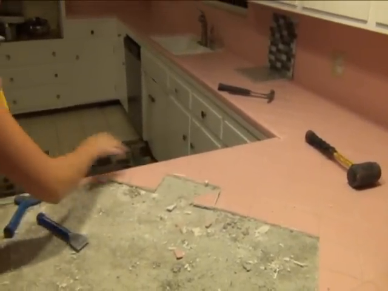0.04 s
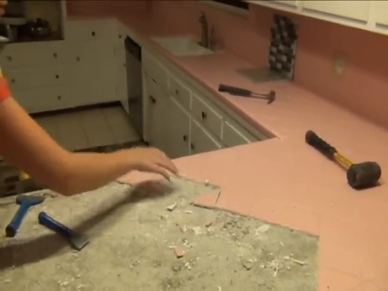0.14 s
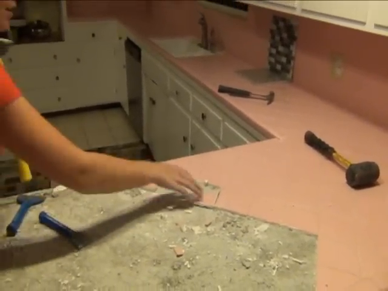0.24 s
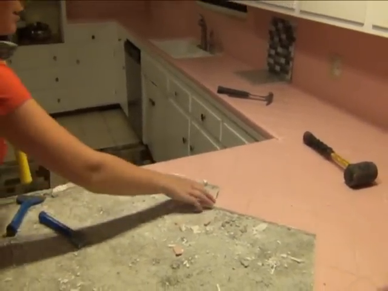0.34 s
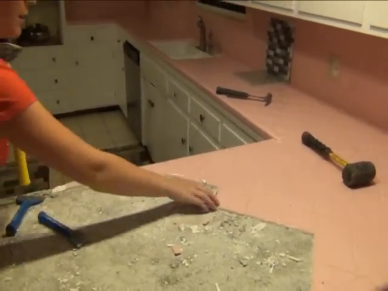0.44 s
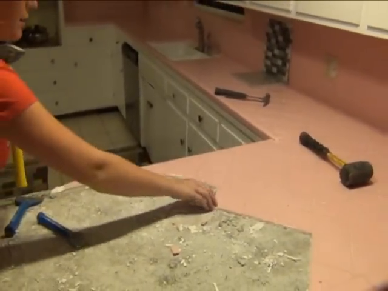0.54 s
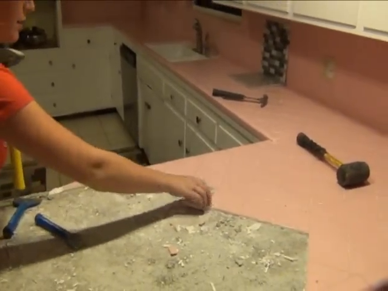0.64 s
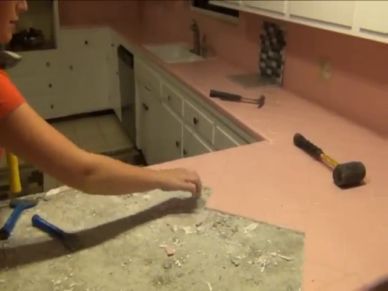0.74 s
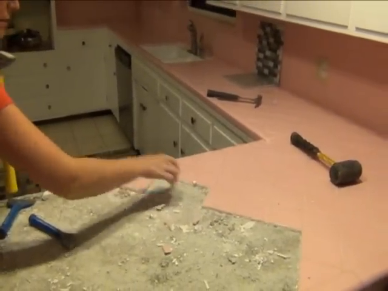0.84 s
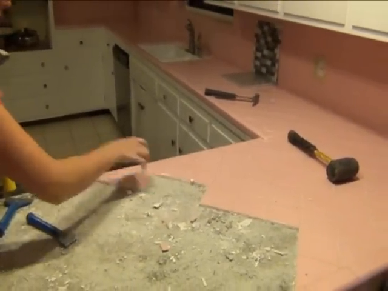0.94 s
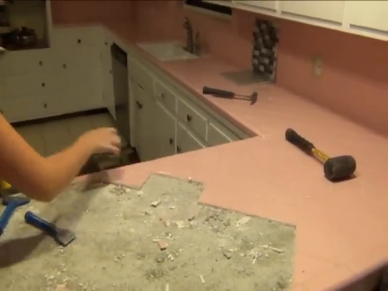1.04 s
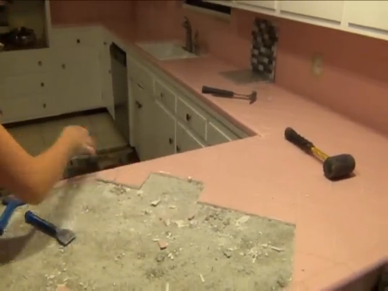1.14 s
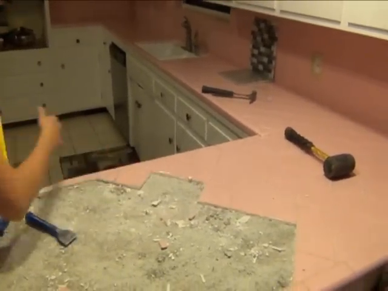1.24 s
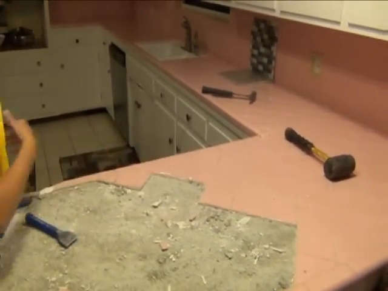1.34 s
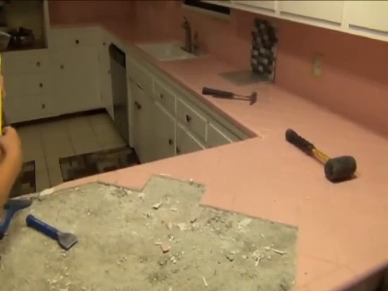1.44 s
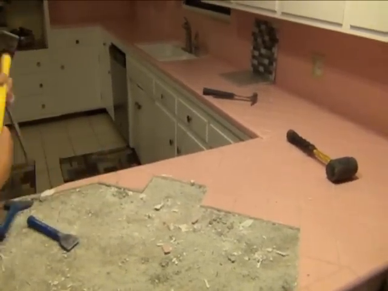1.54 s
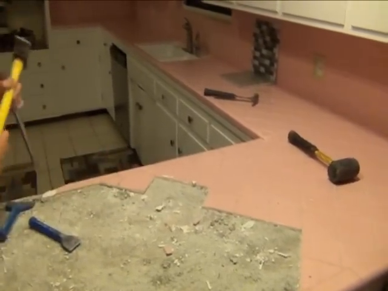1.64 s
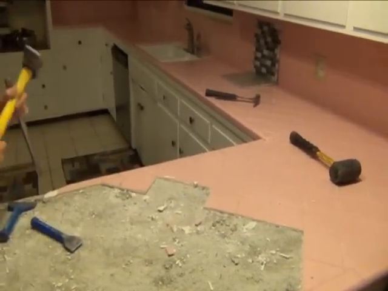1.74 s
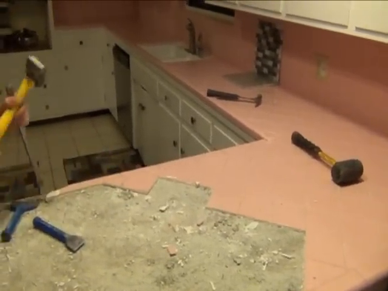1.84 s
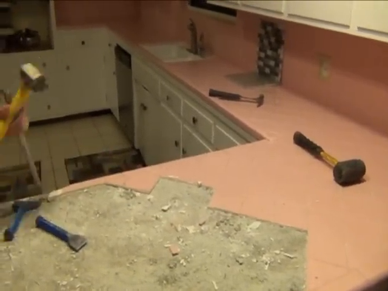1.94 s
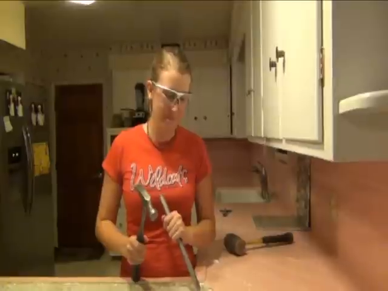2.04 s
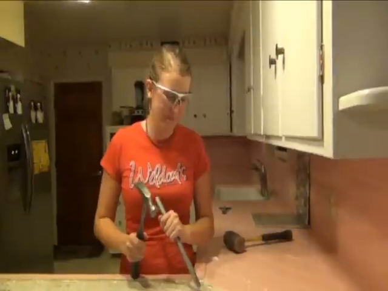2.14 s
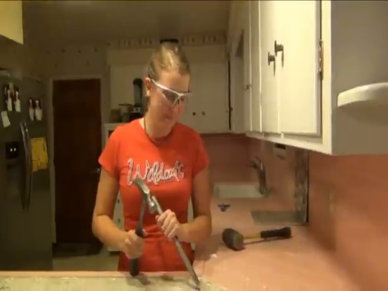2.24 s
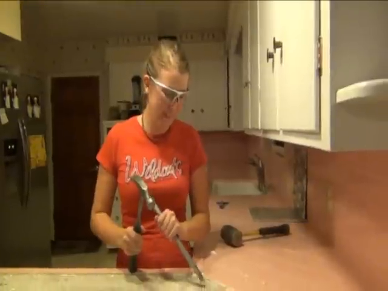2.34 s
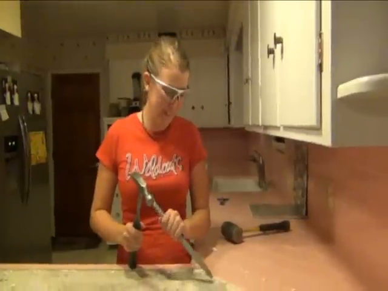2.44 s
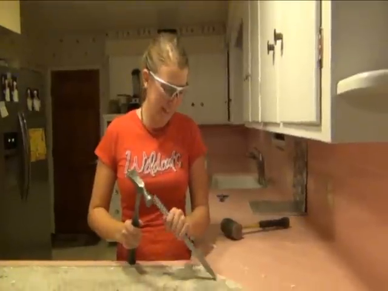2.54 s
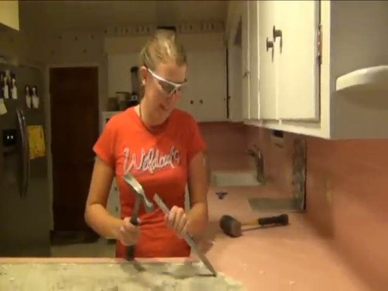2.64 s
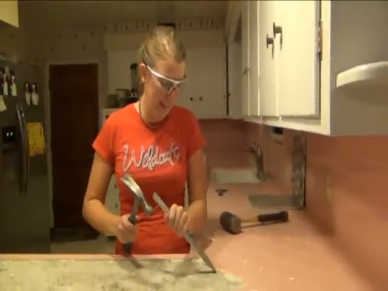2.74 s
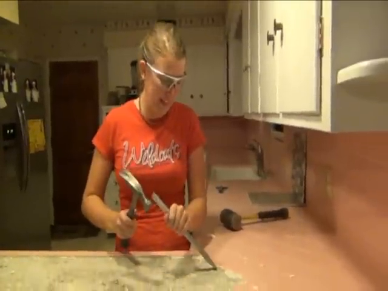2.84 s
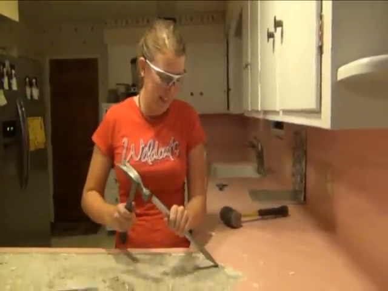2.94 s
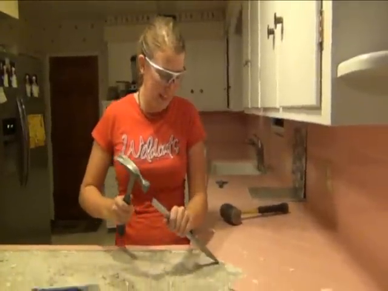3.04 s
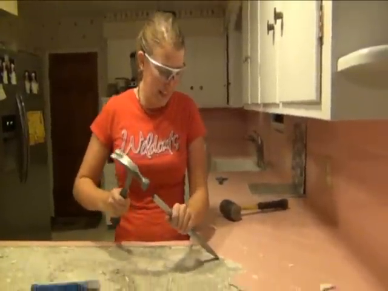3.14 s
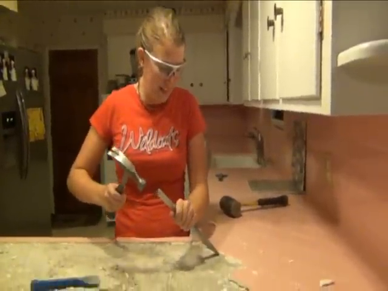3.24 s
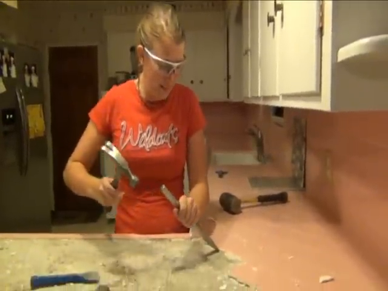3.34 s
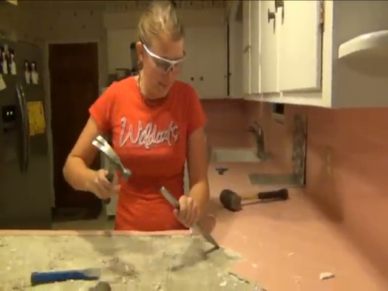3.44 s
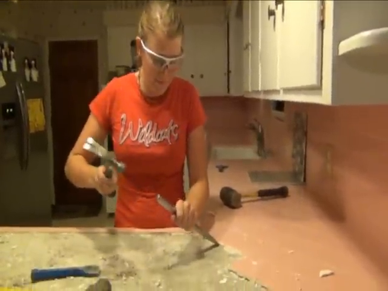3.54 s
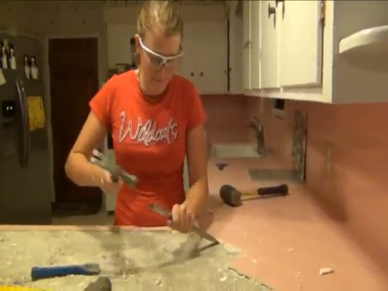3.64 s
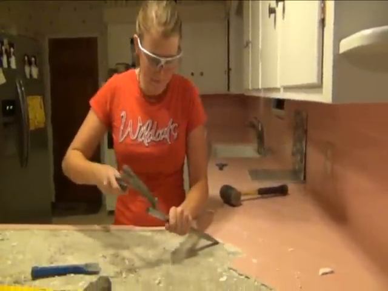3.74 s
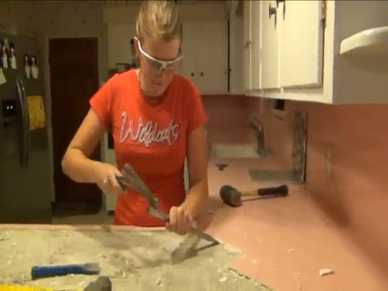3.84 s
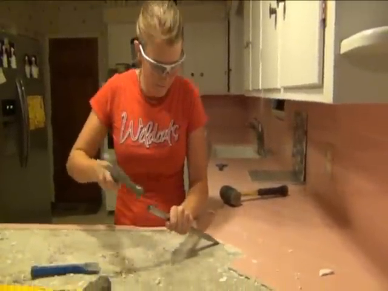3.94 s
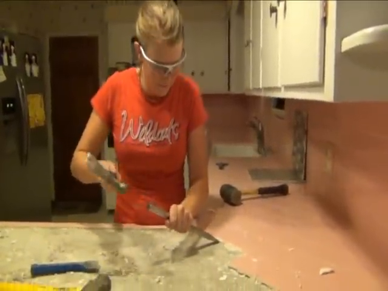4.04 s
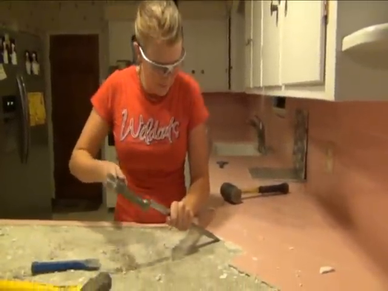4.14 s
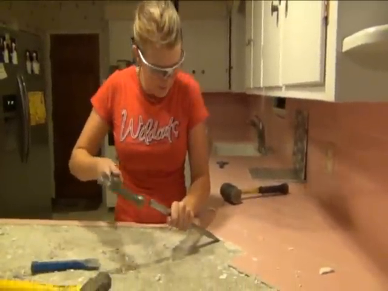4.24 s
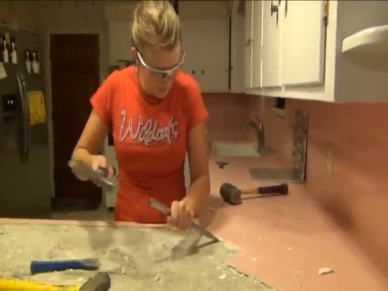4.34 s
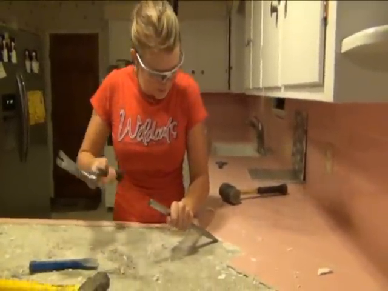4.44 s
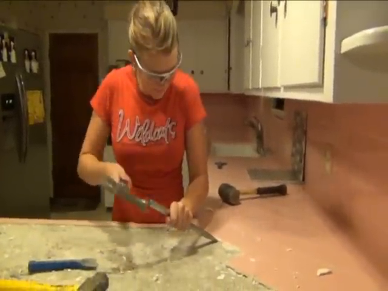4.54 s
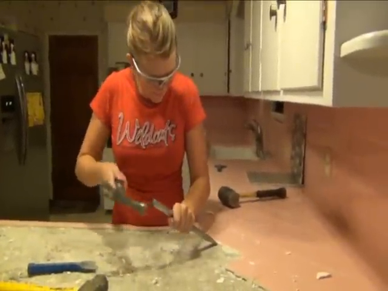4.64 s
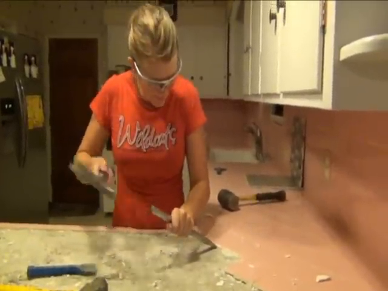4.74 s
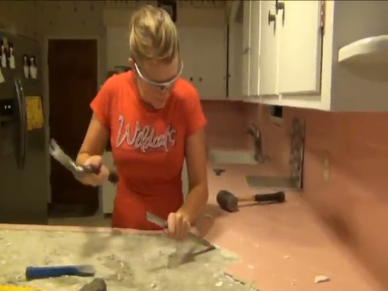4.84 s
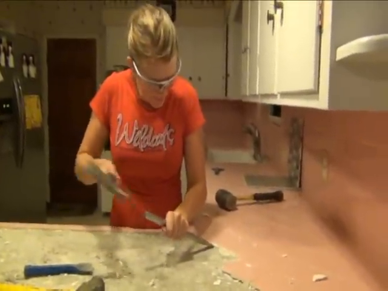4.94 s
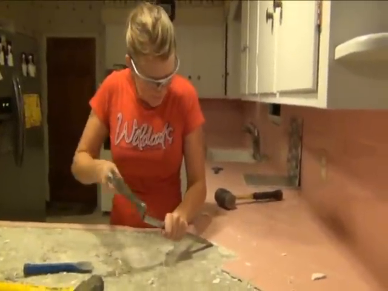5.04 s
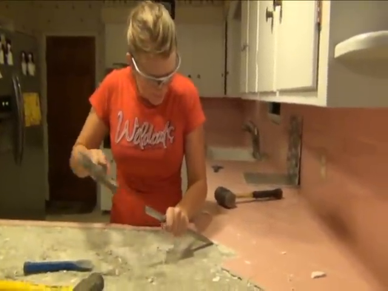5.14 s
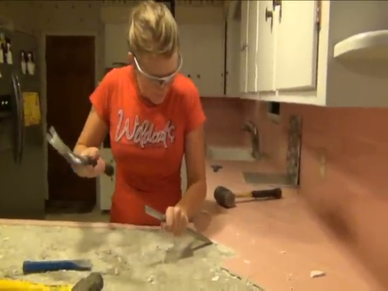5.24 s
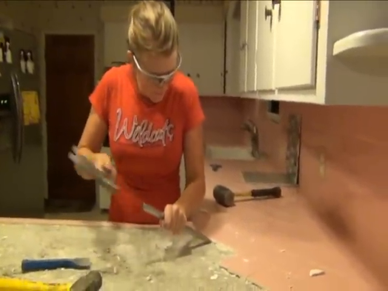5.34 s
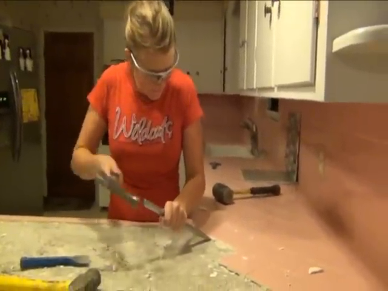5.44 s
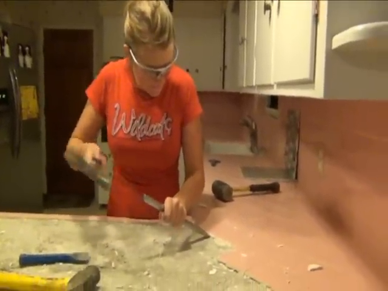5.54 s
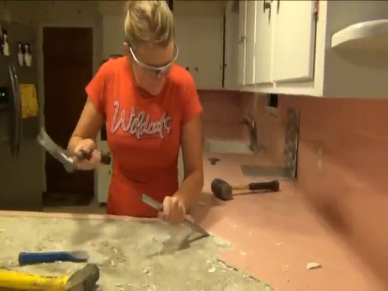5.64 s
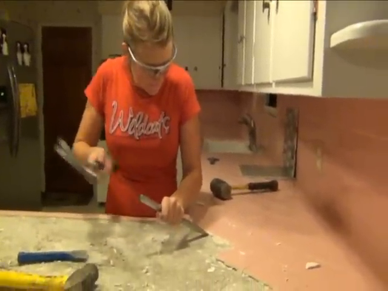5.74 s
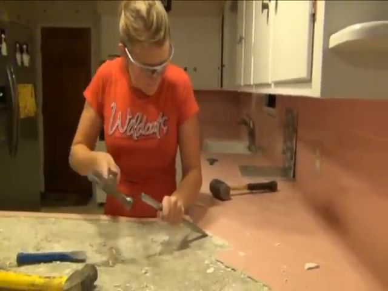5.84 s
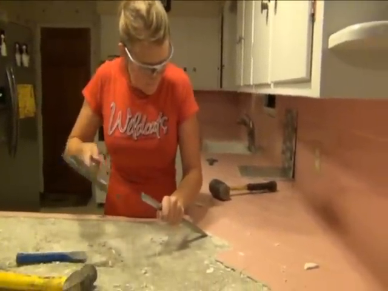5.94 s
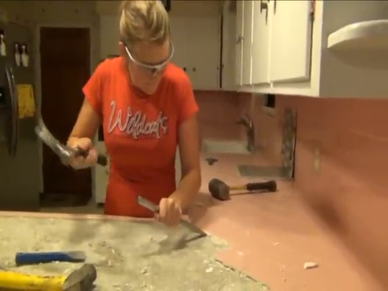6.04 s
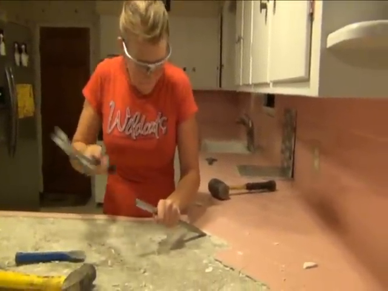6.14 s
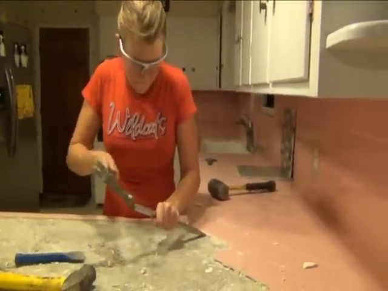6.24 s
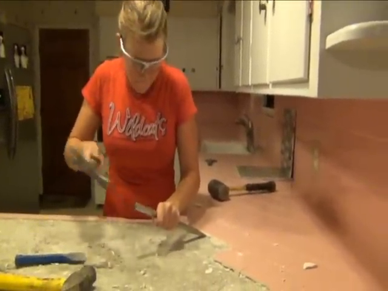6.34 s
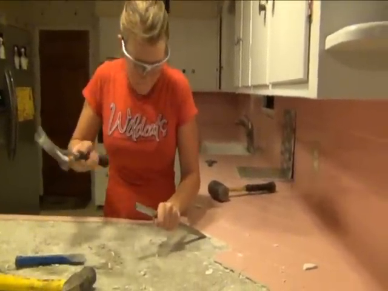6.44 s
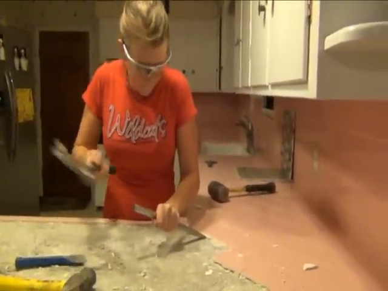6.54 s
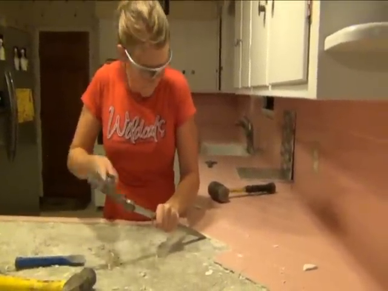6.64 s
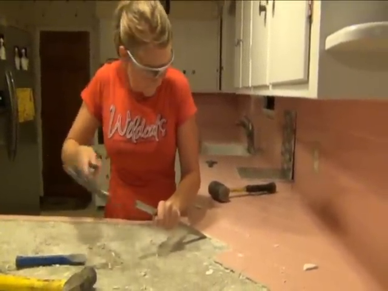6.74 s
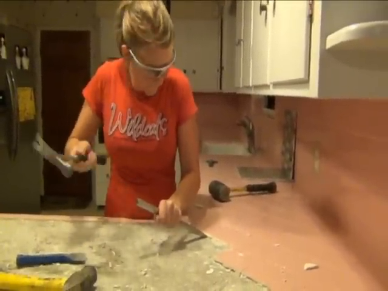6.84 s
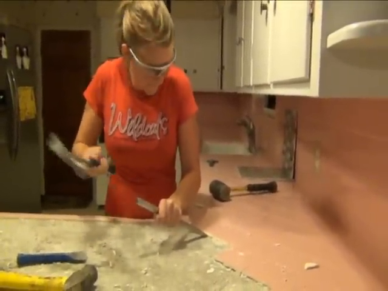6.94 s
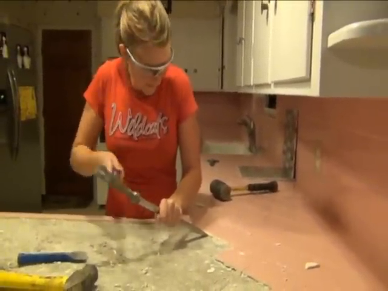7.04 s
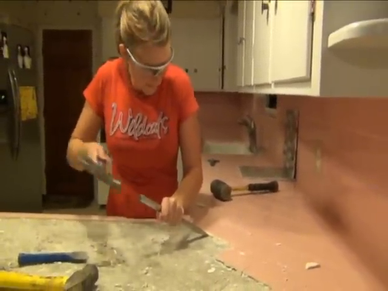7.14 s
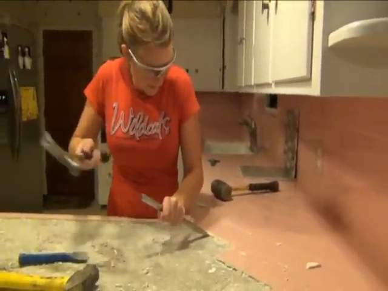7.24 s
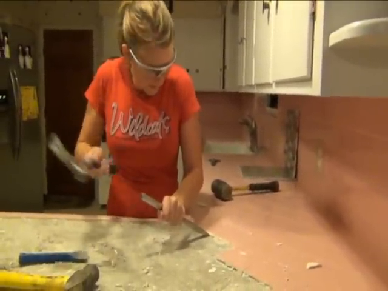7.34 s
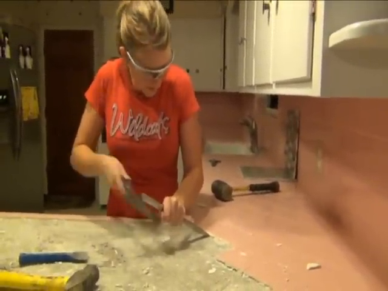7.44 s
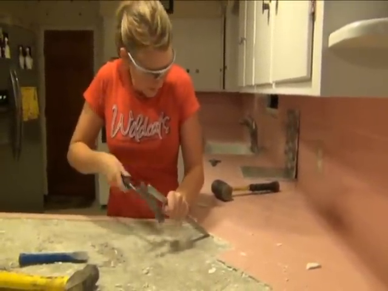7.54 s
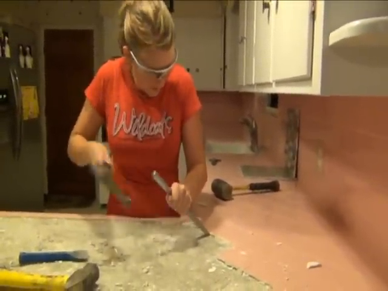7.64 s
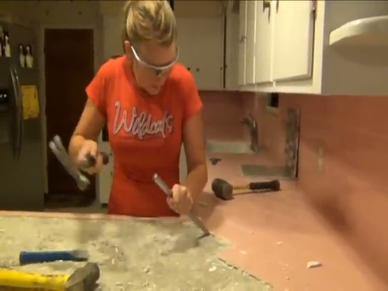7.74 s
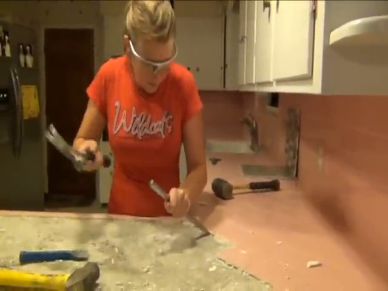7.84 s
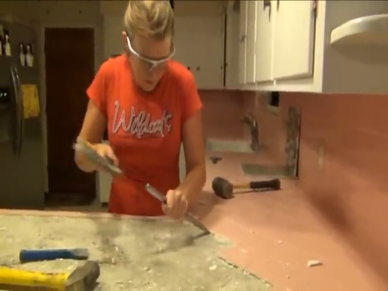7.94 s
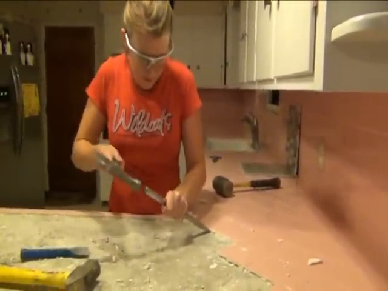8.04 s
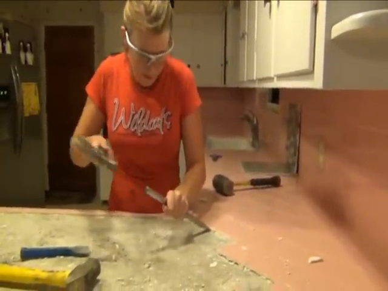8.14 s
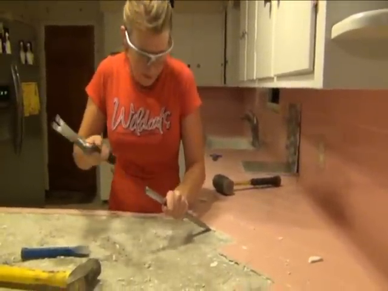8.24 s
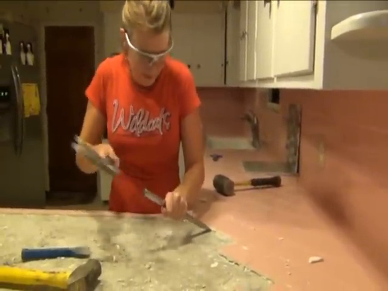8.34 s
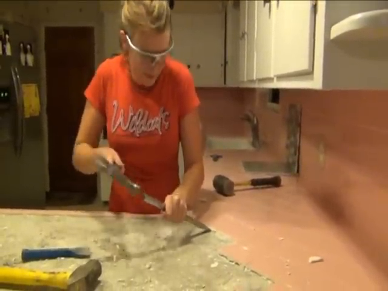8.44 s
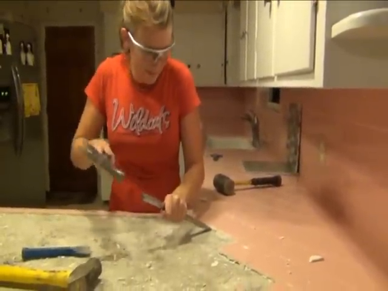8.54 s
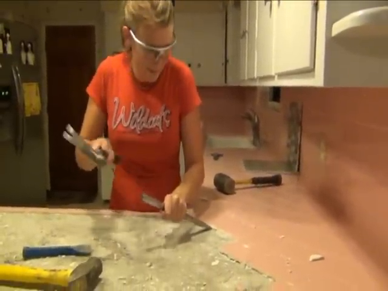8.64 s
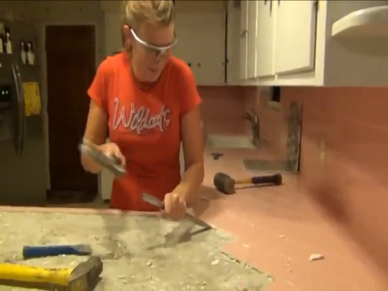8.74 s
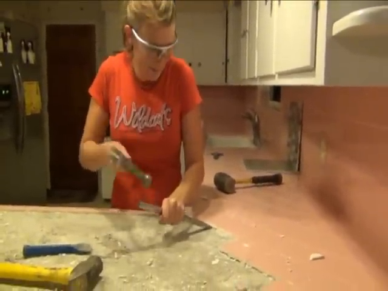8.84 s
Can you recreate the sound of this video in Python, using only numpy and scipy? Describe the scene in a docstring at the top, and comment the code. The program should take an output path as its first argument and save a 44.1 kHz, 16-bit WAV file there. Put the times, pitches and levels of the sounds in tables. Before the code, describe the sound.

Two pieces of broken tile clack onto a pile and tumble to rest, with dull knocks on wood. Then a steel chisel clinks lightly on a tiled counter and is tapped in. A hammer strikes it hard in a steady rhythm, each blow cracking against the tile, booming through the counter and ringing the steel; one glances off. The bare kitchen echoes around the nearby work, over a low room tone.

```python
"""Two pieces of broken tile clack onto a pile and tumble to rest, with dull knocks on wood. Then, abruptly,
a steel chisel clinks on a tiled kitchen counter, is tapped in, and is struck hard with a hammer.
Each square blow cracks against the tile, booms through counter and cabinet, and rings the chisel;
one blow glances off. The bare kitchen echoes over a low room tone, and a limiter holds
the heavy blows nearly flat until their reverberation has died below its ceiling."""
import sys
import numpy as np
from scipy import signal
from scipy.fft import rfft, irfft
from scipy.io import wavfile
from scipy.ndimage import uniform_filter1d

SR = 44100
rng = np.random.default_rng(int(sys.argv[2]) if len(sys.argv) > 2 else 0)


def digitize_waveform(pressure):
    """Quantize a signal to 16-bit integers and store it at the path in sys.argv[1].

    Rows of a 2-D input are taken as channels; values are limited to [-1, 1].
    """
    field = np.atleast_2d(pressure).T
    bounded = np.clip(field, -1, 1)
    quanta = np.round(bounded * 32767).astype(np.int16)
    wavfile.write(sys.argv[1], SR, quanta)


N = 392049
T = np.arange(24576) / SR  # time axis of one hit
HZ = np.fft.rfftfreq(2 * len(T), 1 / SR)
CUT_S = 2.1  # tossing gives way to chiselling

# Tile pieces landing or shifting. Each row: start in seconds, levels in dB of the clack,
# the pile's ring and the loose shard's ring, then seconds between contacts.
TUMBLES = [(0.001, -43, -68, -72, .004), (0.3731, -7.5, -5.5, -45, 0.044), (0.821, -39, -60, -38.5, .012),
           (0.866, -50, -63, -37.5, 0.0011), (0.886, -34.5, -71, -33, .007), (1.72, -9.5, -16, -9, .07),
           (1.939, -36, -46, -32, .001), (2.038, -30.5, -53, -46, .02)]
# Dull knocks on wood. Each row: start in seconds, level in dB, pitch in Hz.
KNOCKS = [(1.703, -21.5, 432), (1.713, -26, 185), (2.666, -18, 419), (2.772, -31, 450), (3.719, -24.5, 399),
          (3.875, -24, 587)]
# Light touches on the chisel. Each row: start in seconds, level in dB, ring brightness in dB per octave.
TAPS = [(2.774, -47, 2), (3.074, -46, -0.5), (3.162, -49.5, 8), (3.715, -36.5, 0), (3.8738, -17.5, -2),
        (4.011, -25, -6.5), (4.177, -43, 7.5)]
# Square hammer blows. Each row: start in seconds, force in dB, and the chisel ring
# that the grip lets through, in dB against that force.
BLOWS = [(4.2918, -5, -2), (4.7056, -2, -4), (5.1364, -1, -7), (5.544, 1, -15.5), (5.9597, 0, -5.5),
         (6.3642, -2, -21), (6.7585, -2.5, -17.5), (7.1674, -2.5, -26), (8.156, -5, -18), (8.552, -4, -26)]
# How firmly the edge is wedged under the tile. Each row: time in seconds, 0 for loose to 1 for tight.
WEDGE = [(4.7, 0.12), (5.5, 0.64), (7.2, 0.51), (8.15, 0.82)]

# What each object rings with. Each row: pitch in Hz, relative level in dB, t60 in seconds.
PILE_MODES = [(1830, -7, 0.074), (2113, 4, 0.063), (2390, -5, .04), (2896, 0.5, 0.019), (4360, 0, 0.029),
              (4430, -7.5, 0.089), (5050, -5.5, 0.05), (7300, -7, 0.043), (7750, -15.5, 0.064),
              (8570, -13.5, 0.07), (9360, -14, .025), (11810, -21, 0.11)]
SHARD_MODES = [(3135, 10.5, 0.041), (4120, 0.5, 0.12), (5010, 5, 0.055), (7390, -1.5, 0.021),
               (7600, -1, 0.058), (10140, -13, .08), (10890, -12, 0.05)]
LOOSE_CHISEL_MODES = [(494, -9.5, 0.23), (1064, -7.5, 0.053), (2540, 2.5, 0.032), (2774, 1.5, 0.0077),
                      (4510, 3, 0.022), (4880, -5.5, 0.41), (7140, -1, 0.04), (10150, -7.5, 0.09)]
COUNTER_MODES = [(580, -9, 0.087), (650, -11.5, 0.33), (693, 5, 0.31), (737, -10, 0.22), (773, -2, 0.041),
                 (886, 3.5, 0.24), (898, 3, 0.17), (929, 7.5, 0.092), (1063, -6, 0.29), (1250, -3.5, 0.038),
                 (1352, 0.5, 0.42)]
CABINET_MODES = [(153, -3.5, 0.35), (293.4, 2, 0.14), (378.4, -8.5, 0.31), (431.5, 0, 0.28)]
CHISEL_MAIN_MODES = [(4953, -3, 0.17), (4980, -9.5, 0.16)]
CHISEL_UPPER_MODES = [(7660, 3, 0.074), (8990, 5.5, 0.11), (9180, 6, 0.079), (10580, -4, .04)]
LAID_TILE_MODES = [(1512, -3.5, 0.072), (2905, -0.5, 0.061), (4700, 0, 0.0099)]
# The wood's hollow ring. Each row: multiple of the knock's pitch, relative level in dB, t60 in seconds.
WOOD_MODES = [(0.779, 6, 0.098), (1.55, -7, 0.035)]

# Colour of the impact noises and the two room tones. Each row: frequency in Hz, relative level in dB.
CLACK_EQ = [(30, -21), (140, -1.5), (400, -5.5), (900, -6.5), (1600, -0.5), (2600, -2.5), (3600, -6),
            (4400, -4.5), (6100, -15), (8000, -8.5), (10000, -27), (12000, -17.5)]
CRACK_EQ = [(30, -38), (70, -12.5), (150, -7), (400, 0.5), (900, 0.5), (1450, 1), (2100, -3.5), (2900, -3),
            (3700, -6.5), (4500, -6), (5900, -8), (6600, -10.5), (7800, -10.5), (9600, -13), (11000, -11.5),
            (12500, -29.5)]
BOOM_EQ = [(30, -97), (120, -20), (255, -26.5), (370, -5), (520, -6), (730, 4), (1050, -7), (1500, -7.5),
           (2500, -21.5), (6000, -43.5)]
TOSSING_TONE_EQ = [(25, -19), (60, -19), (190, -8.5), (450, -11), (1100, -19.5), (2500, -28.5),
                   (6000, -32.5), (12000, -33)]
CHISELLING_TONE_EQ = [(15, -50), (25, -26), (48, -10), (145, 0), (183, -7), (331, -11.5), (440, -15.5),
                      (600, -16.5), (883, -24), (954, -21.5), (3130, -33), (12000, -41.5), (15600, -62),
                      (22000, -120)]
# Colour of a knock's thud. Each row: multiple of its pitch, relative level in dB.
KNOCK_EQ = [(.1, -27), (.35, -1), (.8, -6.5), (1.15, -2), (1.7, -2.5), (2.5, -20), (3.7, -17), (8, -38),
            (25, -37)]
# Fader ride on the room tone under the chiselling. Each row: time in seconds, level in dB.
TONE_FADER = [(2.1, -41.5), (4.2, -37.5), (5.5, -43.5), (7.0, -48.5), (8.0, -46.5), (8.9, -48.5)]
# The kitchen's decay. Each row: frequency in Hz, t60 in seconds at a room size of 1.
KITCHEN_DECAY = [(100, 0.79), (300, 0.43), (800, 0.45), (2000, 0.47), (4000, 0.47), (7000, 0.4),
                 (11000, 0.31)]
# Stereo width of reverb and room tone. Each row: frequency in Hz, side level against mid in dB.
WIDTH = [(60, -21), (140, -16), (300, -12), (600, -9), (2900, -9), (3800, -28), (12000, -34)]


def gain_of(db):
    """Decibels to amplitude."""
    return 10 ** (np.asarray(db) / 20)


def curve_at(points, hz):
    """Reads a curve drawn with straight lines on a log-frequency axis."""
    point_hz, value = np.transpose(points)
    return np.interp(np.log(hz + 1e-6), np.log(point_hz), value)


def add(mix, start_s, sound):
    """Lays a sound into the mix."""
    part = mix[:, max(round(start_s * SR), 0):][:, :sound.shape[1]]
    part += sound[:, :part.shape[1]]


def normalise(hit):
    """Scales a mid-side hit to the energy of 30 ms at level 1."""
    return hit / np.sqrt(np.sum(hit[0] ** 2) / (.03 * SR))


def minimum_phase(db):
    """An EQ with no pre-ring, so attacks stay sharp."""
    cepstrum = irfft(np.log(gain_of(db)))
    cepstrum[1:len(T)] *= 2
    cepstrum[len(T) + 1:] = 0
    return np.exp(rfft(cepstrum))


def kitchen(wet_db, size=0.94, build_s=0.0023):
    """The room's mid-side spectrum: direct sound, then reflections that thicken and die band by band."""
    density = np.clip(.06 + T / .08, 0, 1)
    echoes = rng.standard_normal((2, len(T))) * (rng.random((2, len(T))) < density) / np.sqrt(density)
    hz, t, bands = signal.stft(echoes, SR, nperseg=256)
    bands *= gain_of(-60 * t / (size * curve_at(KITCHEN_DECAY, hz)[:, None]))
    bands[1] *= gain_of(curve_at(WIDTH, hz))[:, None]
    response = signal.istft(bands, SR, nperseg=256)[1][:, :len(T)] * (1 - np.exp(-T / build_s))
    response *= gain_of(wet_db) / np.linalg.norm(response[0])
    response[0, 0] += 1  # direct sound, dead centre
    return rfft(response, 2 * len(T))


def through_room(spectrum, room):
    """Plays a spectrum through the room and returns the normalised hit."""
    return normalise(irfft(spectrum * room)[:, :len(T)])


def chatter(chatter_s):
    """The spectrum of a rough contact: smeared over a short time, even in frequency."""
    age = np.minimum(T / max(chatter_s, .002), 8)
    noise = rfft(rng.standard_normal(len(T)) * gain_of(-60 * age), 2 * len(T))
    whitened = irfft(noise / abs(noise))
    fade = gain_of(-20 * age)
    return rfft(whitened * np.concatenate([fade, fade[::-1]]))


def burst(eq, chatter_s, room, tilt_db=0):
    """The noisy attack of a contact; a harder one tilts brighter, in dB per octave."""
    tilted_eq = [(hz, db + tilt_db * np.log2(hz)) for hz, db in eq]
    return through_room(chatter(chatter_s) * minimum_phase(curve_at(tilted_eq, HZ)), room)


def resonance(hz, t60):
    """One damped mode; it radiates little below its own pitch."""
    s = 1j * HZ / hz
    damping = np.log(1000) / (np.pi * hz * t60)
    return s * s / ((s * (s + damping) + 1) * (s + .5) * (s + 2))


def ring(modes, room, tilt_db=0):
    """A struck object's modes, balanced as they sound in the room."""
    spectrum, room_gain = 0, abs(room[0])
    for hz, db, t60 in modes:
        shape = resonance(hz, t60)
        strength = gain_of(db + tilt_db * np.log2(hz))
        spectrum += shape * strength / np.linalg.norm(shape * room_gain)
    return through_room(spectrum, room)


def tumble(gap_s, contacts=4, settle_s=.21, settle_db=-20):
    """A piece rocks from edge to edge, its contacts weakening faster and faster until it lies still."""
    spectrum = 0
    for delay_s in gap_s * np.arange(contacts):
        strength = gain_of(settle_db * (delay_s / settle_s) ** 2)
        spectrum += strength * np.exp(-2j * np.pi * HZ * delay_s) * chatter(1.44 * gap_s)
    return spectrum


def tossed_tiles(tick_s=0.0028):
    """Ceramic on ceramic: each tumble clacks and sets the pile and the loose piece ringing."""
    out = np.zeros((2, N))
    for start_s, clack_db, pile_db, shard_db, gap_s in TUMBLES:
        bounces = kitchen(wet_db=1.5, size=.98) * tumble(gap_s)
        # Contacts closer than tick_s merge into one hard, bright tick.
        tilt_db = 1.1 + 21 * np.exp(-(gap_s / tick_s) ** 2)
        clack = burst(CLACK_EQ, chatter_s=0.009, room=bounces, tilt_db=tilt_db)
        add(out, start_s, gain_of(clack_db) * clack)
        add(out, start_s, gain_of(pile_db) * ring(PILE_MODES, bounces, tilt_db))
        add(out, start_s, gain_of(shard_db) * ring(SHARD_MODES, bounces, tilt_db))
    return out


def room_tone(eq):
    """The kitchen's steady bed of rumble and hiss, at level 1."""
    hz = np.fft.rfftfreq(N, 1 / SR)
    spectrum = rfft(rng.standard_normal((2, N))) * gain_of(curve_at(eq, hz))
    spectrum[1] *= gain_of(curve_at(WIDTH, hz))
    tone = irfft(spectrum, N)
    return tone / tone[0].std()


def wood_knocks():
    """Soft contacts that only push the wood, which answers with a short hollow ring."""
    out = np.zeros((2, N))
    for start_s, db, hz in KNOCKS:
        room = kitchen(wet_db=0, size=.8)
        thud = burst([(ratio * hz, level) for ratio, level in KNOCK_EQ], chatter_s=0.046, room=room)
        hollow = ring([(ratio * hz, level, t60) for ratio, level, t60 in WOOD_MODES], room)
        add(out, start_s, gain_of(db) * (thud + gain_of(-1) * hollow))
    return out


def chisel_taps():
    """The loosely held chisel and the tile under it clink as it is placed and tapped in."""
    out = np.zeros((2, N))
    for start_s, db, tilt_db in TAPS:
        room = kitchen(wet_db=-0.5, size=.85)
        click = burst(CRACK_EQ, chatter_s=0.053, room=room, tilt_db=tilt_db / 2)
        clink = ring(LOOSE_CHISEL_MODES, room, tilt_db)
        add(out, start_s, gain_of(db) * (gain_of(-2) * click + clink))
    return out


def hammer_blows():
    """Each blow cracks against the tile, drives the counter and the cabinet, and rings the chisel."""
    out = np.zeros((2, N))
    counter_room = kitchen(wet_db=8, build_s=0.0042)  # the counter stays put, so its echoes repeat
    for start_s, force_db, ring_db in BLOWS:
        room = kitchen(wet_db=2.5, build_s=0.0034)  # the chisel shifts from blow to blow
        thump = burst(BOOM_EQ, chatter_s=0.059, room=counter_room)
        boom = normalise(thump + gain_of(-11) * ring(COUNTER_MODES, counter_room))
        crack = burst(CRACK_EQ, chatter_s=0.031, room=room)
        # A tighter edge passes more into the counter: more boom, less crack, cabinet and top ring.
        tightness = np.interp(start_s, *np.transpose(WEDGE))
        blow = (gain_of(-0.54 - 3.5 * tightness) * crack
                + gain_of(-5.5 + 6.5 * tightness) * boom
                + gain_of(-7 - 7.5 * tightness) * ring(CABINET_MODES, room)
                + gain_of(ring_db) * ring(CHISEL_MAIN_MODES, room)
                + gain_of(-11 - 11.5 * tightness) * ring(CHISEL_UPPER_MODES, room))
        add(out, start_s, gain_of(force_db) * blow)
    return out


def glancing_blow(start_s=7.5749):
    """The hammer slips off: a thin crack, with tile and chisel ringing but no boom."""
    out = np.zeros((2, N))
    room = kitchen(wet_db=3, build_s=0.0041)
    crack = burst(CRACK_EQ, chatter_s=0.029, room=room, tilt_db=1.5)
    tile = ring(LAID_TILE_MODES, room)
    chisel = ring(CHISEL_MAIN_MODES, room) + ring(CHISEL_UPPER_MODES, room)
    add(out, start_s, gain_of(-14) * crack + gain_of(-20) * tile + gain_of(-30) * chisel)
    return out


def scene():
    """A hard cut from tossing to chiselling, with knocks across both; mid-side becomes left-right."""
    t = np.arange(N) / SR
    tossing = tossed_tiles() + gain_of(-51) * room_tone(TOSSING_TONE_EQ)
    bed = gain_of(np.interp(t, *np.transpose(TONE_FADER))) * room_tone(CHISELLING_TONE_EQ)
    chiselling = hammer_blows() + glancing_blow() + chisel_taps() + bed
    mid, side = np.where(t < CUT_S, tossing, chiselling) + wood_knocks()
    return np.array([mid + side, mid - side])


def limiter(mix, ceiling_db, release_db_per_s, slope):
    """Ducks at once by a share (slope) of the overshoot, then lets the gain back up steadily."""
    power_db = 10 * np.log10(abs(uniform_filter1d((mix ** 2).mean(0), size=130)) + 1e-12)
    release_db = np.arange(N) * release_db_per_s / SR
    envelope_db = np.maximum.accumulate(power_db + release_db) - release_db
    over_db = np.maximum(envelope_db - ceiling_db, 0)
    return mix / gain_of(slope * uniform_filter1d(over_db, size=40))


def record(dry, clip_level=.85, lowpass_hz=12300):
    """The master chain: limiter, soft clip on the peaks that slip through, steep low-pass."""
    held = limiter(dry, ceiling_db=-13.5, release_db_per_s=191, slope=0.82)
    rounded = held / (1 + (held / clip_level) ** 6) ** (1 / 6)
    lowpass = signal.firwin(255, lowpass_hz, window=("kaiser", 8), fs=SR)
    return signal.oaconvolve(rounded, lowpass[None], "same")


dry = scene()
out = record(dry)
digitize_waveform(out)
```